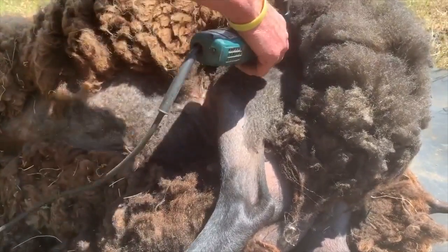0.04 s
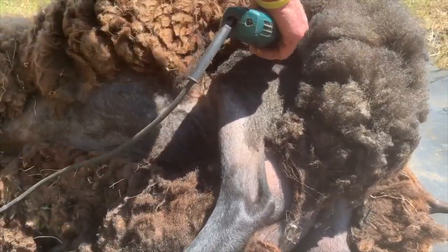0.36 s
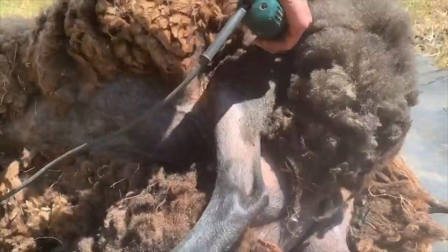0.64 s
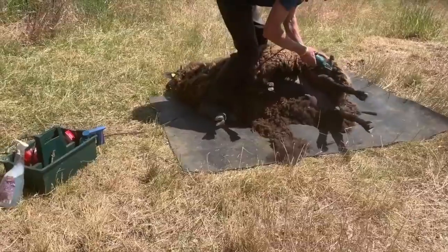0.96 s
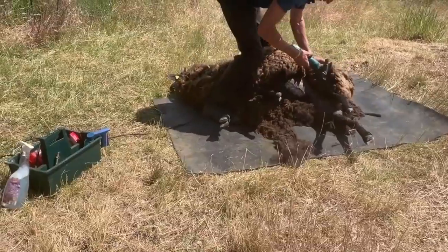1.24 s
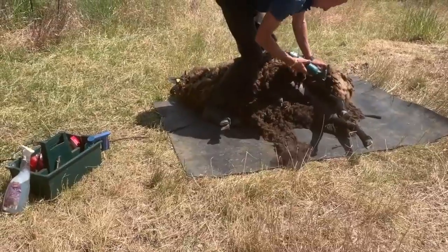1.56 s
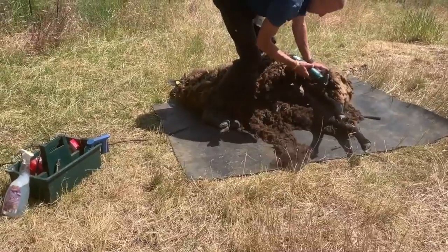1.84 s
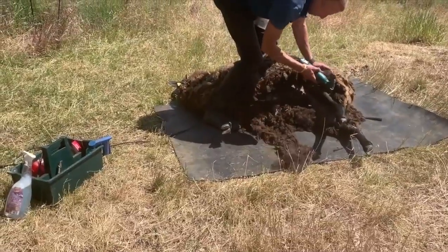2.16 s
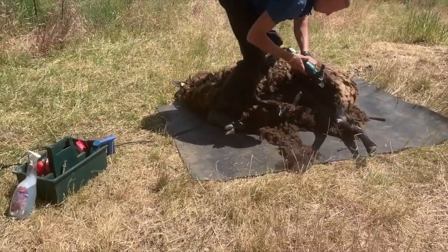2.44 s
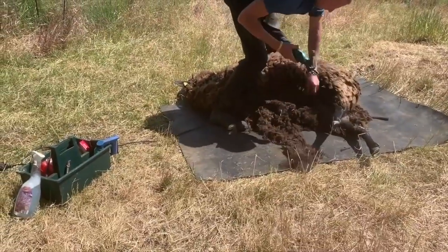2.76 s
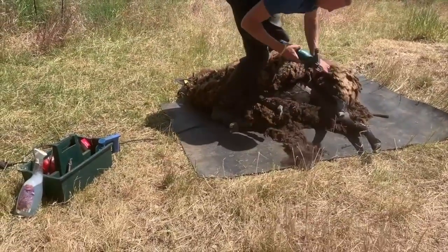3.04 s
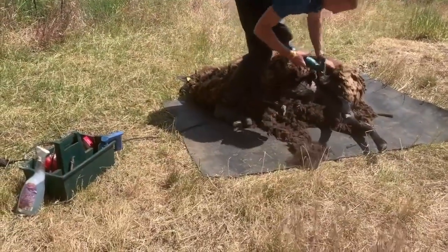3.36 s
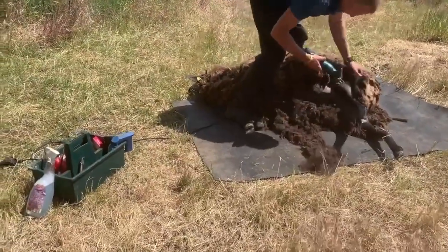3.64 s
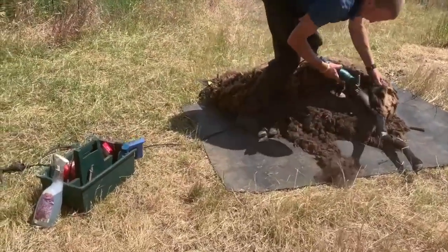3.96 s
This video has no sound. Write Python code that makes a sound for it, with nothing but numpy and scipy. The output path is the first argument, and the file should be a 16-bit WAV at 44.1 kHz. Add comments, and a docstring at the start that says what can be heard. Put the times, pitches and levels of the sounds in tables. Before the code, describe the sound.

Electric sheep shears buzz close up, a rapid steel clatter with motor hum and a rasp of wool, slowing slightly. At about 0.7 seconds they abruptly become quieter, a few metres away, and run on until 4 seconds, brightening with each bite into the fleece. Soft gusts buffet the microphone from 1.2 to 3.6 seconds over faint outdoor air. A faint, thin tone sags briefly around 3 seconds.

```python
"""An electric handpiece shears a sheep outdoors, first close by, then abruptly from a few metres off.
The cutter clacks at both ends of its travel and rings the housing; the comb rasps through the wool
while motor and gears hum, slowing under load. In the wider view a faint tone sounds once and soft
gusts buffet the microphone. Faint outdoor air lies under it all."""
import sys
import numpy as np
from scipy import signal
from scipy.fft import rfft, irfft
from scipy.io import wavfile

SR = 44100
rng = np.random.default_rng(int(sys.argv[2]) if len(sys.argv) > 2 else 0)


def persist_wave(psi):
    """Save psi, clipped to +-1, as 16-bit WAV."""
    counts = np.round(np.clip(psi, -1, 1) * 32767).astype(np.int16)
    wavfile.write(sys.argv[1], SR, np.atleast_2d(counts).T)


N = 176400

# Close cutter, slowing under load: t/s, rate/(strokes per s)
NEAR_SPEED = [(0, 66.23), (0.15, 66.2), (0.4, 65.64), (0.66, 64.49), (0.745, 64.28)]
# EQ of the close blades, mid and side: f/Hz, gain/dB
NEAR_MID_EQ = [(180, -24.5), (300, -12), (366, -24), (397, -17.5), (720, -9), (953, -6.5), (1160, -14),
               (1330, -4.5), (1700, -7), (2170, -5), (2610, -10), (4140, -3.5), (7250, -8), (8840, -1.5),
               (11700, -16), (14300, -10), (15500, -10.5)]
NEAR_SIDE_EQ = [(180, -64), (300, -34), (509, -21), (600, -28), (720, -13.5), (1460, -19.5), (1780, -13),
                (1970, -15), (2480, -5.5), (3130, -10), (7140, -6), (9290, -13.5), (11700, -10.5),
                (14000, -20), (15500, -23)]
# Close comb resonance, shifting and swelling as it presses into the wool: t/s, f/Hz, level/dB
NEAR_COMB = [(0, 2267, -70), (.17, 2220, -51.5), (.25, 2200, -60), (.46, 2154, -49.5), (.56, 2260, -52.5),
             (.62, 2140, -57), (.72, 2094, -52.5)]
def near_shears():
    """The handpiece at arm's length: clacking steel, ringing housing and comb, gears and motor."""
    travel = 0.295 + np.cumsum(curve(NEAR_SPEED)) / SR  # in strokes
    hits = strokes(travel, uneven_db=3.2, scatter_db=.9)
    steel = blades(hits, stretch=.95, tail_s=0.004, tail_db=-17, vary_db=.8)
    return (place(steel, NEAR_MID_EQ, NEAR_SIDE_EQ, mid_db=-43.5, side_db=-44, direct=0.83)
            + undb(-3) * housing(hits, column=2, chatter=0.95, flutter_db=1.5, side_db=-11.5)
            + comb(hits, NEAR_COMB, width_hz=200, side_db=-17)
            + gears(travel) + motor(travel, first_db=-75, octave_db=-69))


# Distant cutter: t/s, rate/(strokes per s)
FAR_SPEED = [(0.745, 69.85), (1, 68.4), (1.2, 68.18), (1.65, 69.82), (1.85, 70.2), (2.1, 69.44),
             (2.35, 68.37), (2.6, 70.13), (2.85, 70.01), (3.1, 70.95), (3.4, 70.8), (3.7, 71.84),
             (4, 71.25)]
# EQ of the distant blades, mid and side: f/Hz, gain/dB
FAR_MID_EQ = [(320, -45), (500, -11), (620, -8.5), (825, -7), (1060, -3.5), (1460, -7.5), (2040, -2.5),
              (2550, -4), (2860, -9.5), (3630, -10.5), (4470, -3.5), (7190, -12.5), (8270, -3), (9510, 0),
              (10200, -2.5), (11600, -19), (13700, -5), (15500, -8.5)]
FAR_SIDE_EQ = [(320, -39), (550, -6), (707, -1.5), (769, -26), (1050, -39), (1220, -6.5), (2070, 0),
               (2520, 1), (3430, -4), (6700, 4.5), (8150, 5), (9240, -1), (11200, 5), (14100, -14),
               (15500, 11)]
# Band faders as the comb meets wool, each taken about its mean: t/s, upper mids/dB, mids/dB, treble/dB
BITE = [(0.78, -63.5, -73, -74.5), (0.81, -72, -73.5, -72.5), (1.3, -63, -74, -72),
        (1.43, -65.5, -73.5, -73.5), (1.82, -63, -74, -68.5), (2.36, -72.5, -74, -69.5),
        (2.49, -63, -72, -71.5), (2.6, -73, -74.5, -68.5), (3.14, -65, -72, -68.5),
        (3.34, -64.5, -73.5, -70), (3.56, -64.5, -71.5, -70), (3.59, -73, -78, -69.5),
        (3.67, -79, -74.5, -67.5), (3.95, -73.5, -74, -70.5)]
# Fader on the housing ring, highest while the cutter runs free: t/s, gain/dB
FAR_RING = [(1.9, -1), (2.65, 2), (2.82, -7), (3.05, -3), (3.5, 0)]
# Distant comb resonance: t/s, f/Hz, level/dB
FAR_COMB = [(.8, 1870, -77.5), (1.35, 1900, -73), (1.74, 2250, -72), (2.4, 1930, -75), (3.03, 2180, -72),
            (3.3, 1840, -71.5), (3.48, 2029, -66.5), (3.63, 2150, -75), (3.9, 2297, -82)]
# Distant motor hum: t/s, level/dB
FAR_HUM = [(.75, -84), (1.35, -84), (1.49, -86), (1.6, -84.5), (2.55, -84), (2.75, -81.5), (3.07, -76.5),
           (3.4, -80.5), (4, -82)]
def far_shears():
    """The handpiece a few metres off, brighter and louder while it bites into the fleece."""
    travel = np.cumsum(curve(FAR_SPEED)) / SR
    travel = 0.262 + travel - travel[int(FAR_SPEED[0][0] * SR)]
    hits = strokes(travel, uneven_db=1.8, scatter_db=1)
    steel = blades(hits, stretch=1.3, tail_s=0.0037, tail_db=-13, vary_db=1.2)
    steel = place(steel, FAR_MID_EQ, FAR_SIDE_EQ, mid_db=-61, side_db=-61.5, direct=0.3)
    upper, mids, treble = (undb(curve(BITE, k) - np.mean(BITE, axis=0)[k]) for k in (1, 2, 3))
    steel = mids * band(steel, 456, 3960) + upper * band(steel, 2710, 7680) + treble * band(steel, 8300)
    swing = strokes(travel, uneven_db=.5, scatter_db=.6)  # the fork's even swing buzzes the housing
    body = housing(swing, column=3, chatter=.05, flutter_db=1.2, side_db=-11)
    return (steel + undb(curve(FAR_RING)) * band(body, 500)
            + comb(hits, FAR_COMB, width_hz=335, side_db=-4)
            + whine(travel) + motor(travel, first_db=curve(FAR_HUM), octave_db=-99))


def strokes(travel, uneven_db, scatter_db, jitter_s=0.00003):
    """An impulse at each end of the cutter's travel; one end hits harder, and no two hits are alike."""
    stroke = np.arange(np.ceil(travel[0]), travel[-1])
    timing, force = rng.standard_normal((len(stroke), 2)).T
    at = np.clip(np.interp(stroke, travel, np.arange(N)) + jitter_s * SR * timing, 0, N - 2)
    size = undb(uneven_db * (stroke % 2 - .5) + scatter_db * force)
    i, fraction = at.astype(int), at % 1
    return np.bincount(i, size * (1 - fraction), N) + np.bincount(i + 1, size * fraction, N)


# Accented strokes: t/s, boost/dB
SNAGS = [(.012, 3.5), (.042, 1), (.528, 1.5), (3.246, 5.5), (3.4, 2.5), (3.695, 4.5), (3.779, 4),
         (3.975, 6.5)]
def snag(hits):
    """Strokes that catch in the fleece hit harder."""
    t = np.arange(N) / SR
    return hits * undb(sum(db * (np.abs(t - at) < .006) for at, db in SNAGS))


# Noise bands of one clack: low/Hz, high/Hz, delay/s, decay before stretch/s, relative level/dB
CLACK = [(925, 2300, 0.0019, 0.0016, -5.5), (3470, 8970, 0.0008, 0.0025, -1.5),
         (7180, 11740, 0.00071, 0.00094, -0.5), (10100, 13870, 0.00093, 0.0015, 1.5)]
def blades(hits, stretch, tail_s, tail_db, vary_db, attack_s=0.0005):
    """A steel clack and short rattle at each hit, over the comb's grainy rasp; two unrelated copies."""
    t = np.arange(-(SR // 50), SR // 50 + 1) / SR
    grain = unit(np.exp(.2 * wander(830)))
    out = undb(-5) * band(grain * rng.standard_normal((2, N)), 1, 17500, order=6)  # the rasp
    for low, high, delay, decay, db in CLACK:
        age = t - delay
        fall = np.hypot(np.exp(-age / (decay * stretch)), undb(tail_db) * np.exp(-age / tail_s))
        envelope = 1 / np.hypot(np.exp(-age / (attack_s * stretch)), 1 / fall)
        force = snag(hits) * undb(vary_db * wander(50))  # per band, so each clack has its own colour
        bursts = unit(signal.fftconvolve(force, envelope, "same"))
        out += undb(db) * band(bursts * rng.standard_normal((2, N)), low, high, order=10)
    return out


def place(pair, mid_eq, side_eq, mid_db, side_db, direct):
    """EQ and pan the blades: direct sound reaches the right ear first, the rest comes from all round."""
    side = direct * quarter_lag(pair[0]) + np.sqrt(1 - direct ** 2) * pair[1]
    return widen(undb(mid_db) * unit(eq(pair[0], mid_eq)), undb(side_db) * unit(eq(side, side_eq)))


def comb(hits, resonance, width_hz, side_db):
    """Hits and scraping ring one resonance of the comb, whose pitch moves with the pressure."""
    carrier = np.exp(2j * np.pi * np.cumsum(curve(resonance)) / SR)
    drive = (unit(hits) + .5) * rng.standard_normal((2, N))
    lowpass = signal.butter(2, width_hz / 2, fs=SR, output="sos")
    mid, side = unit((signal.sosfilt(lowpass, drive / carrier) * carrier).real)  # a moving band-pass
    return undb(curve(resonance, 2)) * widen(mid, undb(side_db) * side)


# Housing modes: f/Hz, width/Hz, relative level close/dB, relative level distant/dB
HOUSING_MODES = [(135, 120, -76.5, -100), (274, 114, -78, -99), (593, 110, -82, -87),
                 (696, 160, -69.5, -88), (918, 71, -73, -86), (1067, 43, -67, -73.5),
                 (1173, 70, -84, -79.5), (1280, 93, -66.5, -81.5), (2090, 120, -66, -83.5),
                 (2660, 120, -62.5, -92.5), (4030, 250, -55, -109), (4100, 780, -69, -92),
                 (5640, 145, -54, -101), (5960, 200, -61, -85)]
def housing(hits, column, chatter, flutter_db, side_db, lag_s=0.0011):
    """Hits and gear chatter ring the housing's modes, which swell and fade as it is turned."""
    drive = unit(np.roll(hits, int(lag_s * SR))) + chatter * rng.standard_normal(N)
    body = 0
    for k, mode in enumerate(HOUSING_MODES):
        gain = undb(mode[column] + flutter_db * wander(2))
        body += (-1) ** k * gain * unit(resonate(drive, mode[0], mode[1]))
    return widen(body, undb(side_db) * quarter_lag(body))


# Gear tones, heard only close by: multiple of the stroke rate, level/dB
GEAR_TONES = [(8, -78), (14, -71), (16, -74), (21, -67), (28, -66), (30, -65), (33.5, -56.5)]
def gears(travel, slack_strokes=0.0041, waver_db=1.5):
    """Tones locked to the crank (two strokes a turn), wavering with the play between the teeth."""
    out = 0
    for multiple, db in GEAR_TONES:
        cycles = multiple * (travel + slack_strokes * wander(8.8)) + rng.random()
        out += np.sqrt(2) * undb(db + waver_db * wander(2.7)) * np.sin(2 * np.pi * cycles)
    return out


MOTOR_TURNS_PER_STROKE = 5.6
def motor(travel, first_db, octave_db):
    """The armature hums at its turning rate and the octave above."""
    phase = 2 * np.pi * MOTOR_TURNS_PER_STROKE * travel
    return np.sqrt(2) * (undb(first_db) * np.sin(phase) + undb(octave_db) * np.sin(2 * phase))


# Distant armature whine: t/s, sixth harmonic/dB, seventh harmonic/dB
FAR_WHINE = [(1.3, -85, -89.5), (1.52, -88, -77.5), (1.9, -78.5, -91), (2.2, -81, -78), (2.6, -84, -98)]
def whine(travel, slack_strokes=0.0016):
    """Two high harmonics of the armature waver and come and go as the handpiece is turned."""
    phase = 2 * np.pi * MOTOR_TURNS_PER_STROKE * (travel + slack_strokes * wander(14))
    tone = undb(curve(FAR_WHINE, 1)) * np.exp(6j * phase) + undb(curve(FAR_WHINE, 2)) * np.exp(7j * phase)
    return np.sqrt(2) * widen(tone.real, undb(-13) * tone.imag)


# Pitch and fade of the faint tone: t/s, f/Hz, level/dB
TONE = [(2.68, 718, -115), (2.76, 723.2, -80.5), (2.88, 715, -75), (3.0, 716.3, -75.5), (3.15, 702, -84),
        (3.26, 695, -115)]
def faint_tone():
    """A thin, pure tone behind the shears that sags as it fades."""
    tone = np.sqrt(2) * undb(curve(TONE, 2)) * np.exp(2j * np.pi * np.cumsum(curve(TONE)) / SR)
    return widen(tone.real, undb(2.5) * tone.imag)


# EQ of the outdoor air bed: f/Hz, gain/dB
AIR_EQ = [(20, -14), (60, 2), (120, -13.5), (250, -11.5), (480, -19), (1000, -31), (4000, -36),
          (15000, -48)]
# Gusts on the microphone: t/s, length/s, level/dB, start pitch/Hz, end pitch/Hz
GUSTS = [(1.216, .035, -65, 177, 124), (1.243, .04, -65, 150, 127), (1.339, .1, -67, 107, 56.3),
         (1.542, .19, -77.5, 78.6, 69.6), (2.08, .1, -75, 118, 85.63), (2.366, .16, -71.5, 85.6, 85.18),
         (2.494, .12, -71.5, 186, 192), (2.48, 0.11, -70, 102, 96.5), (2.613, 0.062, -69.5, 127, 98.3),
         (3.036, 0.065, -73.5, 378, 309), (3.066, 0.0397, -61.5, 190, 147), (3.092, 0.056, -56, 97, 60.75),
         (3.22, .09, -72.5, 80, 120), (3.346, .06, -64.5, 129.8, 45.06), (3.45, 0.13, -68.5, 86.3, 66.53)]
def wind(air_db=-83, spread=0.33):
    """Soft low buffets that swell fast and mostly drop in pitch as they die away, over faint air."""
    out = undb(air_db) * unit(eq(rng.standard_normal((2, N)), AIR_EQ))
    for start, length, db, from_hz, to_hz in GUSTS:
        i, n = int(start * SR), int(length * SR)
        swell = np.sin(np.pi * np.linspace(0, 1, n) ** 0.87)
        lowpass = signal.butter(2, spread * (from_hz + to_hz) / 2, fs=SR, output="sos")
        eddies = signal.sosfilt(lowpass, rng.standard_normal((2, 2, SR // 2)))[..., -n:]
        phase = 2 * np.pi * np.cumsum(np.geomspace(from_hz, to_hz, n)) / SR
        puff = [undb(db) * unit(swell * (a * np.cos(phase) + b * np.sin(phase))) for a, b in eddies]
        out[:, i:i + n] += np.array(puff)[:, :N - i]
    return band(widen(out[0], undb(-11) * out[1]), 36, order=4)


def undb(db):
    return 10 ** (np.asarray(db) / 20)


def unit(x):
    """Scale to an rms of 1."""
    return x / np.sqrt(np.mean(x ** 2) + 1e-30)


def curve(rows, column=1):
    """One column of a table, joined by straight lines in time."""
    rows = np.array(rows)
    return np.interp(np.arange(N) / SR, rows[:, 0], rows[:, column])


BIN_HZ = np.maximum(np.arange(N // 2 + 1) * SR / N, 1)
def eq(x, points):
    """Filter by a curve of f/Hz, gain/dB."""
    hz, db = np.array(points).T
    return irfft(rfft(x) * undb(np.interp(np.log(BIN_HZ), np.log(hz), db)), N)


def resonate(x, hz, width_hz):
    """A resonance with gain 1 at its centre."""
    return irfft(rfft(x) / (1 + 1j * (BIN_HZ ** 2 - hz ** 2) / (BIN_HZ * width_hz)), N)


def band(x, low_hz, high_hz=SR, order=8):
    """Band-pass without delay."""
    return irfft(rfft(x) / (1 + (low_hz / BIN_HZ) ** order) / (1 + (BIN_HZ / high_hz) ** order), N)


def wander(rate_hz):
    """A smooth random drift with an rms of 1."""
    return unit(irfft(rfft(rng.standard_normal(N)) / (1 + (BIN_HZ / rate_hz) ** 4), N))


def quarter_lag(x):
    """Delay every frequency by a quarter cycle."""
    return irfft(-1j * rfft(x), N)


def widen(mid, side):
    return np.array([mid + side, mid - side])


def scene(cut_s=0.7407, crossfade_s=0.012):
    """Cut from the close shears to the distant ones, over the tone and the wind."""
    far = np.clip((np.arange(N) / SR - cut_s) / crossfade_s + .5, 0, 1)
    return (1 - far) * near_shears() + far * far_shears() + faint_tone() + wind()


def record(dry):
    """A steep low-pass takes off the treble above 15850 Hz."""
    return signal.sosfilt(signal.ellip(10, .2, 70, 15850, fs=SR, output="sos"), dry)


dry = scene()
out = record(dry)
persist_wave(out)
```